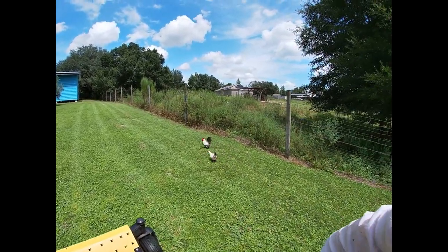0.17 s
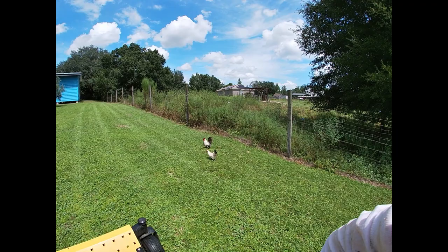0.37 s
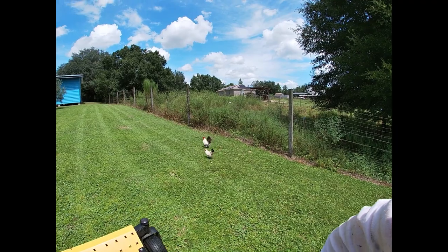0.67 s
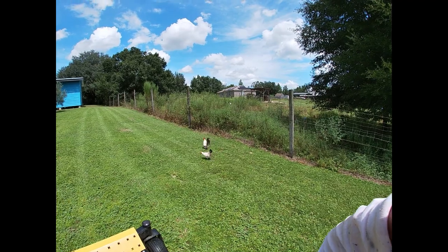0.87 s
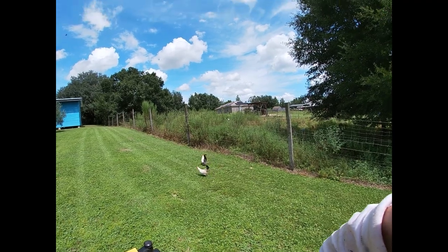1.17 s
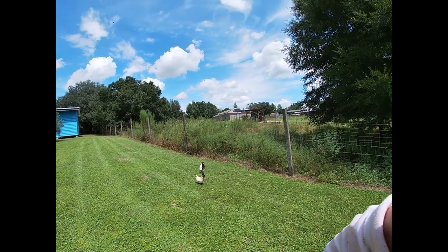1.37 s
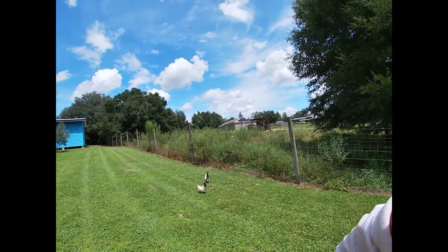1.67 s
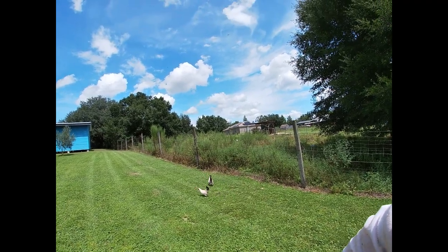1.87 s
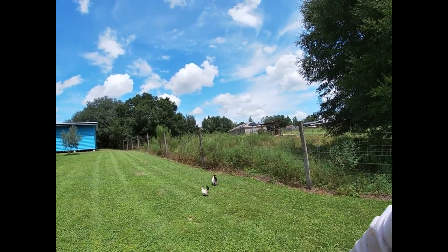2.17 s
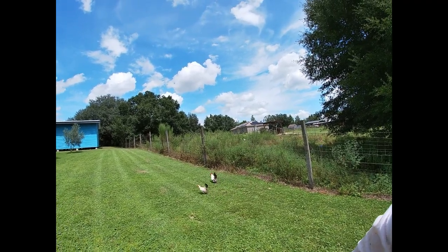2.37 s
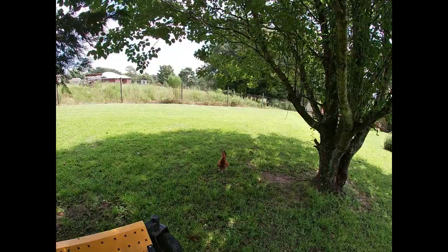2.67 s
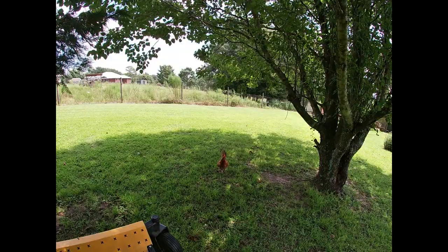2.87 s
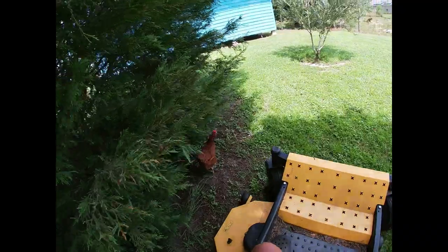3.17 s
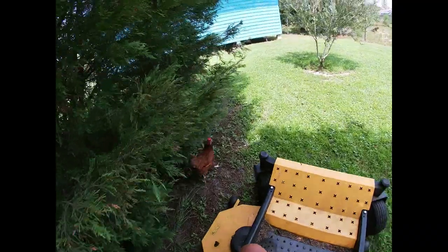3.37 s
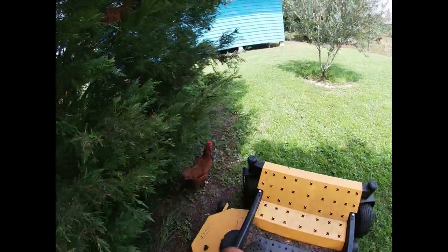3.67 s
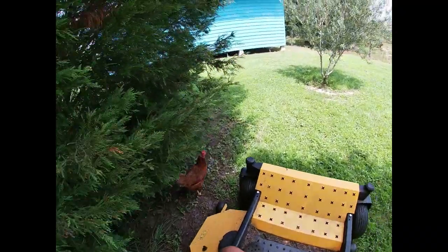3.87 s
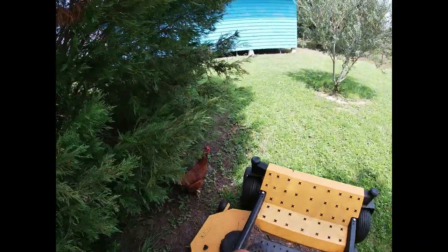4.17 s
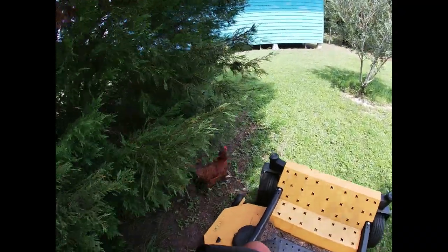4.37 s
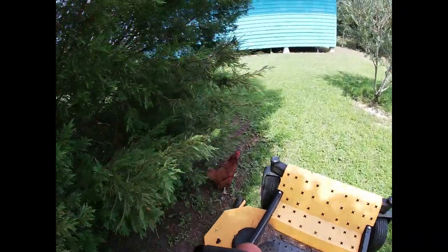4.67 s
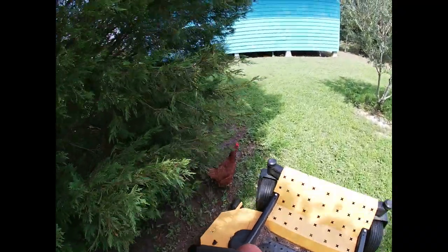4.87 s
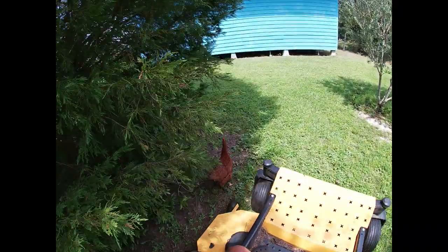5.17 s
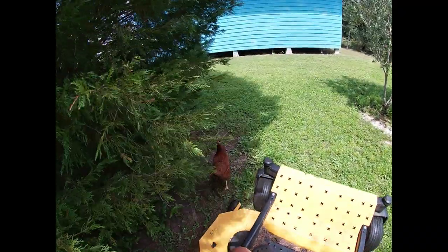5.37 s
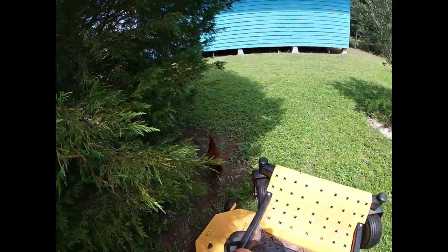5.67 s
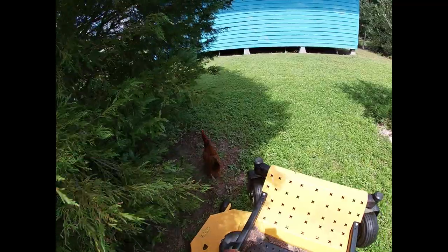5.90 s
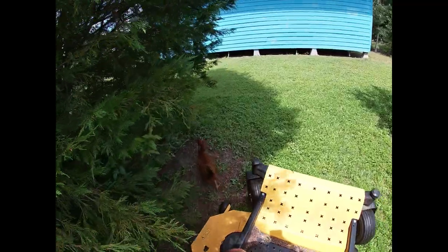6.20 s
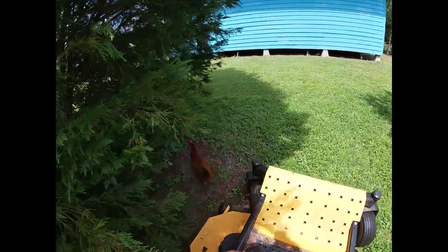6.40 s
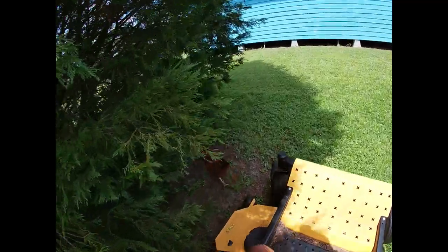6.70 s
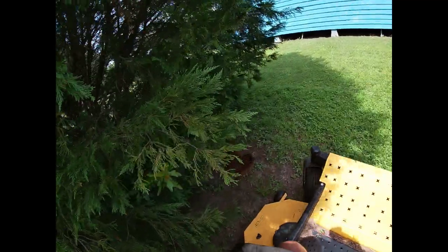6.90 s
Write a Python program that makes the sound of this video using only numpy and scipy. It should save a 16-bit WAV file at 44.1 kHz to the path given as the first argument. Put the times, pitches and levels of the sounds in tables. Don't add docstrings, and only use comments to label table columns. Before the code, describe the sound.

A riding mower's twin engine drones loudly under load with blades thrumming and grass roaring under the deck, broken by two abrupt cuts.

```python
import sys
import numpy as np
from scipy import signal
from scipy.fft import rfft, irfft, next_fast_len
from scipy.io import wavfile
from scipy.ndimage import uniform_filter1d, map_coordinates

SR = 44100
rng = np.random.default_rng(int(sys.argv[2]) if len(sys.argv) > 2 else 0)


def volts_from_decibels(level):
    exponent = np.asarray(level, float) / 20
    return 10 ** exponent


def bounce(signal):
    frames = np.transpose(np.atleast_2d(signal))
    limited = np.clip(frames, -1, 1)
    pcm = np.round(limited * 32767).astype(np.int16)
    wavfile.write(sys.argv[1], SR, pcm)


N = 310443


def unit(x):
    return x / np.sqrt(np.mean(x ** 2) + 1e-20)


def curves(rows):
    s, *columns = np.transpose(rows)
    return [np.interp(np.arange(N) / SR, s, column) for column in columns]


def wobble(rate):
    knots = rng.standard_normal(int(N * rate / SR) + 4)
    coarse = map_coordinates(knots, [np.arange(N // 64 + 2) * 64 * rate / SR])
    return np.interp(np.arange(N) / 64, np.arange(len(coarse)), coarse)


def rush(spectrum, patchy_db):
    _, _, z = signal.stft(rng.standard_normal(N + 1024), SR, nperseg=1024)
    field = uniform_filter1d(rng.standard_normal(z.shape), size=10, axis=0)
    field = uniform_filter1d(field, size=6, axis=1)
    noise = signal.istft(z * volts_from_decibels(patchy_db * unit(field)), nperseg=1024)[1][:N]
    hz, db = np.transpose(spectrum)
    size = next_fast_len(N)
    log_hz = np.log(np.fft.rfftfreq(size, 1 / SR) + 1)
    colour = volts_from_decibels(np.interp(log_hz, np.log(hz), db, left=-120, right=-120))
    return unit(irfft(rfft(noise, size) * colour, size)[:N])


def order(turns, multiple, db, lead, flutter_db, blur):
    angle = 2 * np.pi * (multiple * turns + lead) + blur * multiple * wobble(9)
    return np.sqrt(2) * volts_from_decibels(db + flutter_db * wobble(7)) * np.cos(angle)


def engine(take, cycles):
    # level in take 1/dB, take 2/dB, take 3/dB
    exhaust_orders = [(-37, -36, -37.5), (-26, -28, -27), (-32.5, -28, -32), (-42, -31.5, -33),
                      (-23.5, -62, -23), (-33, -30, -27.5), (-39, -37.5, -34.5), (-32, -32, -26),
                      (-47.5, -36.5, -48), (-40, -38, -31), (-34.5, -66, -29), (-35, -45, -39),
                      (-48.5, -48, -37), (-34, -47.5, -41), (-36, -49, -35), (-33.5, -41, -33.5),
                      (-38, -42, -42.5), (-37.5, -39, -37), (-43.5, -45, -31.5), (-47.5, -42, -45.5),
                      (-39.5, -38.5, -33), (-48.5, -57, -43), (-40.5, -36, -47.5), (-41, -44, -42),
                      (-44.5, -46, -48) ]
    pulley_db = [-33, -36.5, -41.5]
    pulley_turns = 4.47
    tones = []
    for multiple, db in enumerate(exhaust_orders, start=1):
        lead = .78 / (1 + np.exp(multiple - 8))
        scatter = rng.normal(0, .001 * multiple ** 2)
        flutter_db = 0.17 + 0.14 * multiple
        blur = .0018 * (5 + multiple)
        tones.append(order(cycles, multiple, db[take], lead + scatter, flutter_db, blur))
    pulley = order(cycles, pulley_turns, pulley_db[take], 0, flutter_db=6.0, blur=0.038)
    return sum(tones) + pulley


def blades(take, spindle):
    # spindle order, level in take 1/dB, take 2/dB, take 3/dB
    blade_orders = [(1, -56, -70, -41.5), (2, -23, -34, -25), (3, -28.5, -26, -29.5),
                    (4, -14.5, -27.5, -19), (5, -32, -32.5, -30), (6, -33.5, -33, -29),
                    (8, -36.5, -38, -29.5), (10, -38.5, -62, -40.5), (12, -47.5, -41.5, -40),
                    (16, -43, -68, -41)]
    # t/s, spindle order, rise/dB, half length/s
    swells = [(.15, 6, 5.5, 0.087), (.63, 6, 7, .1), (2.688, 4, 6.5, 0.047), (2.92, 2, 6, .04),
              (2.924, 4, 19, 0.024), (2.935, 6, 15.5, 0.035), (3.116, 6, 13.5, 0.28), (3.676, 6, 7.5, 0.11),
              (3.103, 8, 6, .12), (3.936, 4, -8, .1), (4.85, 6, 6.5, 0.17), (5.287, 4, 4.5, 0.15),
              (5.453, 6, 11.5, 0.095), (5.795, 6, 7, 0.074), (6.003, 4, 7.5, 0.12), (6.4, 2, -4, 0.55),
              (6.4, 6, 4, .1), (6.65, 4, -7, 0.74), (6.85, 6, 0.5, 0.089)]
    t = np.arange(N) / SR
    tones = []
    for multiple, *db in blade_orders:
        multiple = round(multiple)
        lead = .88 + (multiple > 3) * rng.normal(0, .04 * multiple)
        swell_db = 0
        for s, swelling, rise_db, half in swells:
            if round(swelling) == multiple:
                swell_db = swell_db + rise_db * np.exp(-((t - s) / half) ** 2)
        flutter_db = .5 + .12 * multiple
        blur = .0012 * multiple ** 2
        tones.append(order(spindle, multiple, db[take] + swell_db, lead, flutter_db, blur))
    return sum(tones)


def churned_air(take, gain_db):
    # f/Hz, level/dB per Hz
    deck_spectra = [
        [(5, -27), (25, -32.5), (45, -17.5), (70, -11.5), (120, -12), (190, -1.5), (290, -5.5), (420, -7),
         (540, -14), (680, -12.5), (850, -21), (1200, -20), (2000, -40)],
        [(25, -27), (45, -31), (70, -9), (120, 1), (190, -1), (290, 1), (420, 1.5), (540, -8), (680, -0.5),
         (850, -14), (1200, -13.5), (2000, -58)],
        [(5, -28.5), (25, -33), (45, -9), (70, -11.5), (135, -2), (190, -3), (290, -1.5), (420, -7.5),
         (540, -7), (720, -9.5), (850, -21), (1200, -23.5), (2000, -35)],
    ]
    return volts_from_decibels(gain_db) * rush(deck_spectra[take], patchy_db=0.42)


def cutting_roar(take, gain_db):
    # f/Hz, level/dB per Hz
    roar_spectra = [
        [(450, -24.5), (600, -13), (700, -7), (850, -4.5), (1270, -11.5), (1510, -11), (1750, -15.5),
         (2070, -15), (2440, -21), (3500, -24), (5000, -32.5), (6500, -62.5)],
        [(450, -25), (600, -7), (700, -8), (900, 0), (1310, -5.5), (1560, -11.5), (1980, -13), (2530, -21.5),
         (2760, -17.5), (3780, -27), (5000, -37), (6500, -63)],
        [(450, -23), (600, -5.5), (720, -3.5), (900, -1), (1010, -8), (1320, -8), (1620, -6.5), (2130, -17),
         (2820, -16), (3350, -22.5), (5000, -35.5), (6500, -60.5)],
    ]
    return volts_from_decibels(gain_db + 4.5) * rush(roar_spectra[take], patchy_db=0.75)


def chute_hiss(take, gain_db):
    # f/Hz, level/dB per Hz
    hiss_spectra = [
        [(2500, -33.5), (4200, -12.5), (4800, -3), (5500, 3.5), (5900, -0.5), (6400, -6), (7000, -13.5),
         (8500, -46.5)],
        [(2500, -27), (4200, -10), (4800, -5), (5400, -1), (5900, -3), (6400, -7), (7000, -14), (8500, -40)],
        [(2500, -33), (4200, -4), (4800, -2.5), (5400, -0.5), (5900, -2.5), (6400, -8), (7000, -10.5),
         (8500, -42.5)],
    ]
    return volts_from_decibels(gain_db + 0.92 * wobble(120)) * rush(hiss_spectra[take], patchy_db=1.06)


def grass_sizzle(take, gain_db, spindle):
    # f/Hz, level/dB per Hz
    sizzle_spectra = [
        [(5510, -25), (7210, -2), (8410, -1.5), (9510, -5.5), (10510, -9.5), (12110, -4), (13110, -7.5),
         (15500, -17.5)],
        [(5510, -27.5), (7210, -0.5), (8410, -6), (9510, -8.5), (10510, -14.5), (11610, -8.5), (12510, -13.5),
         (13600, -20)],
        [(5510, -28), (7210, -1.5), (8410, -3.5), (9510, -6), (10210, -10.5), (12010, -5.5), (12710, -7),
         (14800, -17)],
    ]
    ticking_db = [3.8, 1, -0.7]
    tick = np.exp(3.1 * (np.cos(2 * np.pi * spindle) - 1)) * np.abs(1.3 + .7 * wobble(15))
    gain_db = gain_db + ticking_db[take] * tick + 1.2 * wobble(120)
    return volts_from_decibels(gain_db) * rush(sizzle_spectra[take], patchy_db=1.0)


def air(take, cycles, spindle):
    # churned air/dB, roar/dB, hiss/dB, sizzle/dB
    air_levels = [(-20.5, -37.5, -52, -64), (-25, -32.6, -48, -63), (-19, -35.5, -50.5, -63.5)]
    # t/s, cutting effort/dB
    grass = [(0, 0.5), (.6, 0.3), (1.4, -0.96), (2.5, .3), (2.6, -3.5), (2.7, 0), (2.8, -.5), (2.9, 0.5),
             (3, -0.7), (3.6, .2), (4, -0.3), (4.5, .6), (4.9, -0.4), (5.3, .8), (5.7, -1.5), (6.4, 0.85),
             (7.04, 0.7)]
    # facing ahead at t/s, roar gain/dB per s
    head_turns = [(1.25, -1), (2.76, -1), (5, 0.3)]
    follows = [.75, 0.9, .85, .7]
    levels_db = air_levels[take] + np.outer(curves(grass)[0], follows)
    deck_db, roar_db, hiss_db, sizzle_db = levels_db.T

    ahead_s, turn_rate = head_turns[take]
    turn_db = turn_rate * (np.arange(N) / SR - ahead_s)
    roar_db = roar_db + turn_db
    hiss_db = hiss_db - .6 * turn_db

    firing = np.cos(2 * np.pi * cycles) + 0.62 * np.cos(4 * np.pi * cycles)
    passing = np.cos(4 * np.pi * spindle) + 0.36 * np.cos(2 * np.pi * spindle)
    load = .5 * wobble(8) + .7 * wobble(30)
    deck = churned_air(take, deck_db + 0.28 * load + 0.33 * firing + 0.82 * passing)
    roar = cutting_roar(take, roar_db + 0.76 * load + 0.48 * firing + 0.47 * passing)
    hiss = chute_hiss(take, hiss_db + 0.74 * load + .4 * firing + .6 * passing)
    sizzle = grass_sizzle(take, sizzle_db + 1.4 * load, spindle)
    return deck + roar + hiss + sizzle


def mower(take):
    # t/s, engine cycle f/Hz
    speed = [
        [(0, 27.58), (.85, 27.8), (1.5, 27.9), (2.32, 28), (2.54, 27.98)],
        [(2.6, 27.85), (2.92, 27.85)],
        [(2.99, 26.97), (3.8, 26.91), (4.2, 27.03), (4.81, 26.91), (5.21, 26.75), (5.62, 26.5), (6.02, 26.55),
         (6.23, 26.61), (6.63, 26.86), (7.04, 26.98)],
    ]
    crank_start = [.09, 0, .055]
    spindle_start = [-.015, 0, .16]
    belt_ratio = 1.7175
    turned = np.cumsum(curves(speed[take])[0]) / SR
    cycles = turned + crank_start[take]
    spindle = belt_ratio * turned + spindle_start[take]
    return engine(take, cycles) + blades(take, spindle) + air(take, cycles, spindle)


def stems():
    # t/s, peak level/dB
    twigs = [(0.592, -42.5), (1.4304, -46), (1.5417, -40), (2.0006, -46.5), (3.479, -45), (4.439, -40),
             (5.3183, -36), (6.3796, -41)]
    out = np.zeros(N + SR)
    t = np.arange(SR // 20) / SR
    for s, db in twigs:
        decay = volts_from_decibels(db - 11.5 - 60 * t / .06)
        out[round(s * SR):][:len(t)] += decay * rng.standard_normal(len(t))
    rattle = signal.butter(3, [4000, 10000], "bandpass", fs=SR, output="sos")
    return signal.sosfilt(rattle, out[:N])


def wind_filter(x):
    # t/s, share of the bass cut 0-1
    low_cut = [(2.6, 0.02), (2.63, 0.67), (2.86, 0.94), (2.9, 0.03), (2.95, 0.95), (3.17, 0.27), (3.2, 0)]
    share = np.clip(curves(low_cut)[0], 0, 1)
    sections = signal.butter(2, 120, "highpass", fs=SR, output="sos")
    return (1 - share) * x + share * signal.sosfiltfilt(sections[:1], x)


def top_band(x, take):
    # highest kept f/Hz, its flicker/Hz
    top_edge = [(14650, 330), (12850, 150), (14150, 150)]
    settle_from_s, settle_s, settle_hz = 3.3, .5, 1450
    hz, t, z = signal.stft(x, SR, nperseg=2048)
    edge_hz, flicker_hz = top_edge[take]
    unsettled = np.clip(1 - (t - settle_from_s) / settle_s, 0, 1) * (take == len(top_edge) - 1)
    edge = edge_hz - settle_hz * unsettled + flicker_hz * np.round(rng.standard_normal(len(t)))
    return signal.istft(z * (hz[:, None] < edge), SR, nperseg=2048)[1][:N]


def splice(x, fade_from, fade_to, cut, pressure, left_db, left_t60):
    t = np.arange(N) / SR
    rise = np.sin(np.pi / 2 * np.clip((t - fade_from) / (fade_to - fade_from), 0, 1)) ** 3
    near_cut = np.clip(1 - (cut - t) / .0015, 0, 1)
    body = rise * x * (1 - near_cut) + pressure * near_cut
    leftover = x * volts_from_decibels(left_db - 60 * np.clip(t - cut, 0, 1) / left_t60)
    return np.where(t < cut, body, leftover)


def scene():
    takes = [
        (-1, -.5, 2.53528, -.075, -38, .028),
        (2.579, 2.612, 2.92061, .105, -21, .024),
        (2.981, 3.013, 8, 0, -40, .05),
    ]
    mix = stems()
    for take, joints in enumerate(takes):
        heard = top_band(wind_filter(mower(take)), take)
        mix = mix + splice(heard, *joints)
    return mix[None]


def low_pass(x):
    return signal.sosfilt(signal.butter(12, 15900, fs=SR, output="sos"), x)


def record(dry):
    rounded = dry / (1 + np.abs(dry / .78) ** 5) ** (1 / 5)
    return low_pass(rounded)


dry = scene()
out = record(dry)
bounce(out)
```